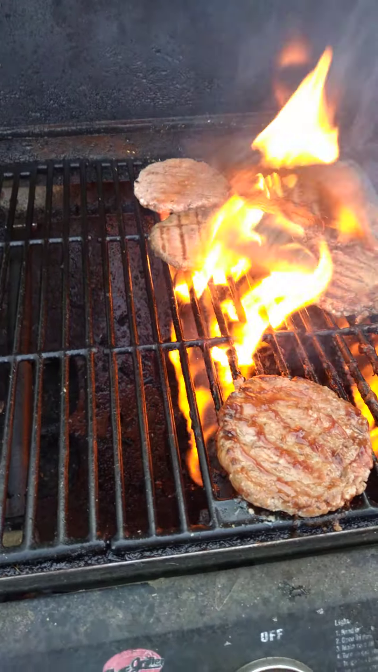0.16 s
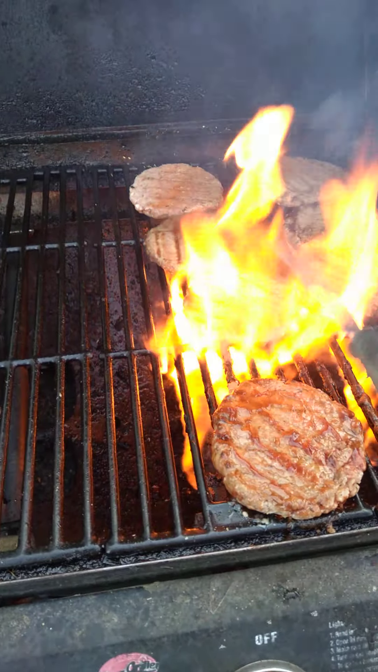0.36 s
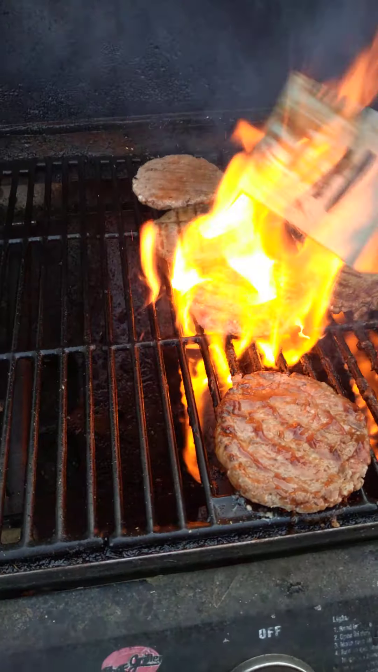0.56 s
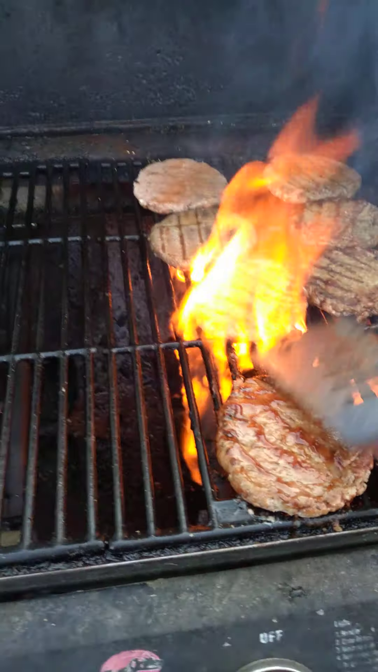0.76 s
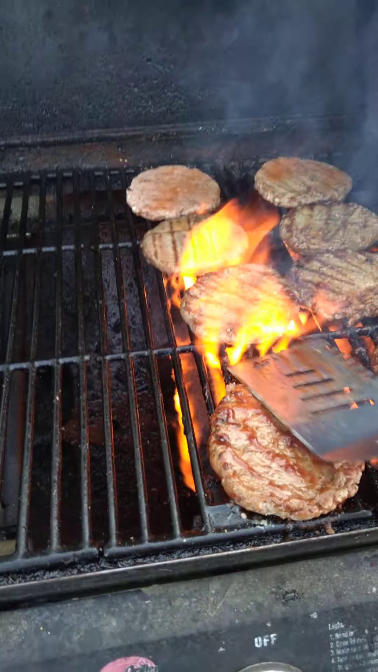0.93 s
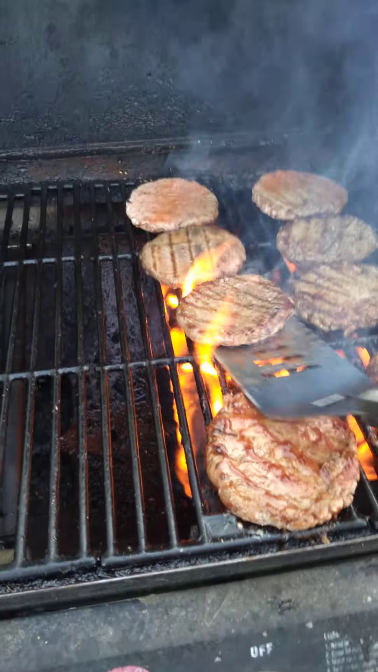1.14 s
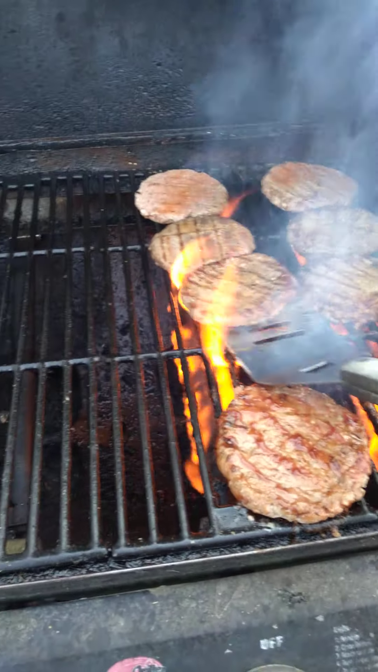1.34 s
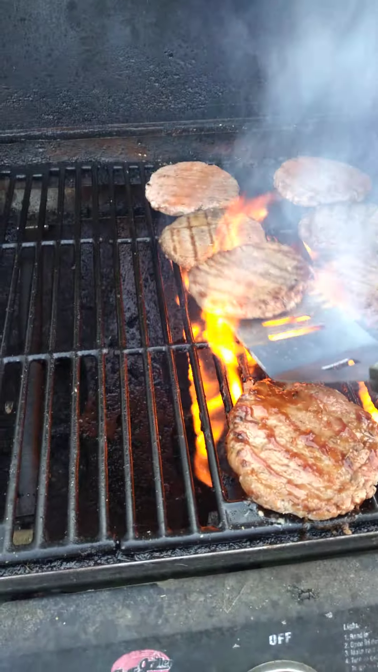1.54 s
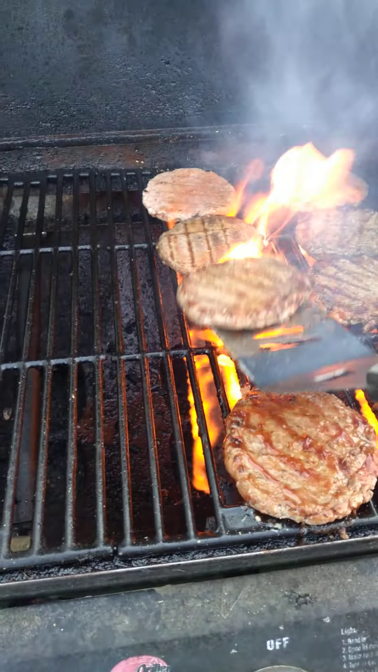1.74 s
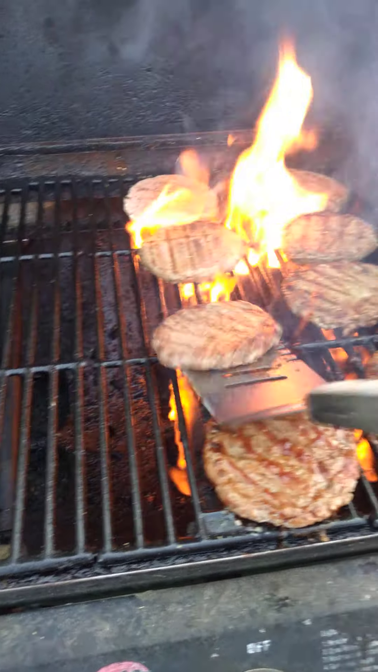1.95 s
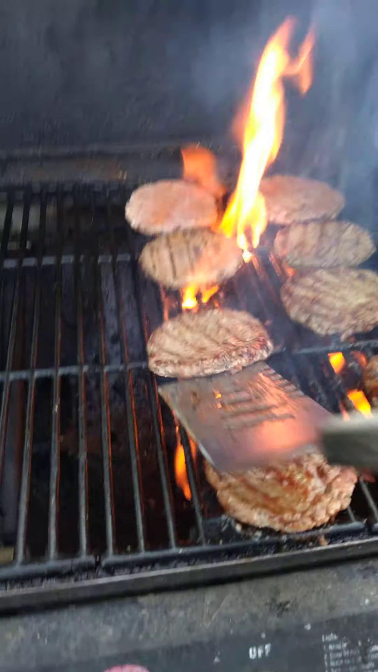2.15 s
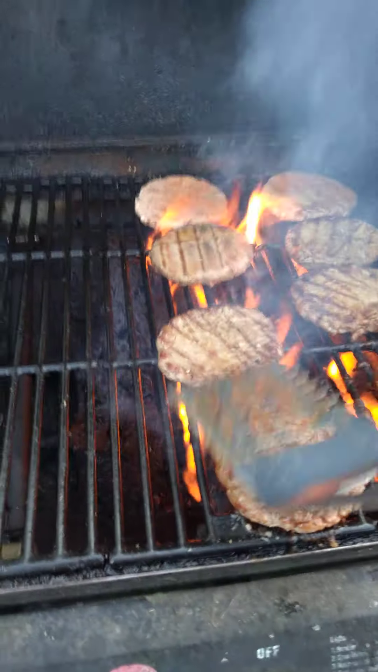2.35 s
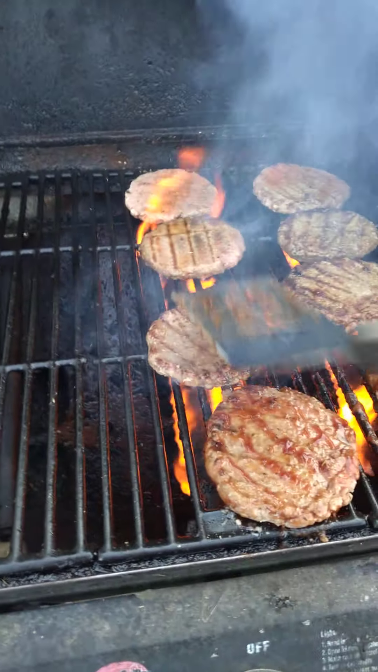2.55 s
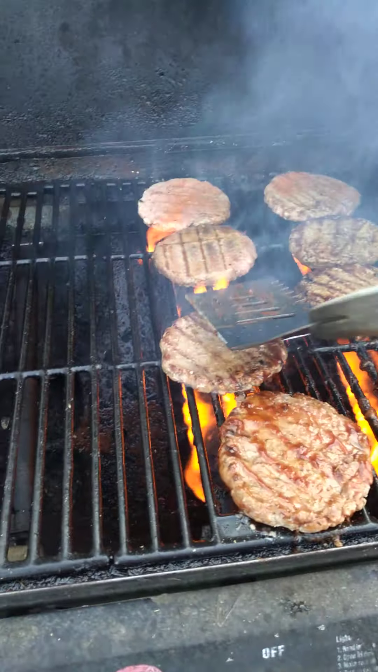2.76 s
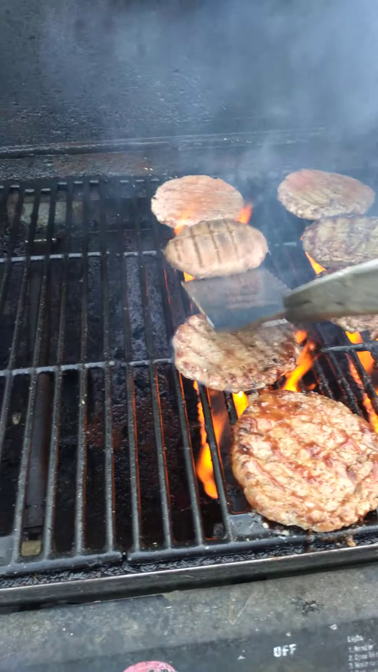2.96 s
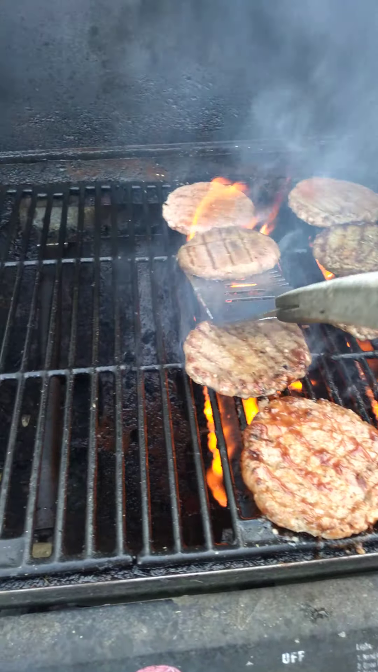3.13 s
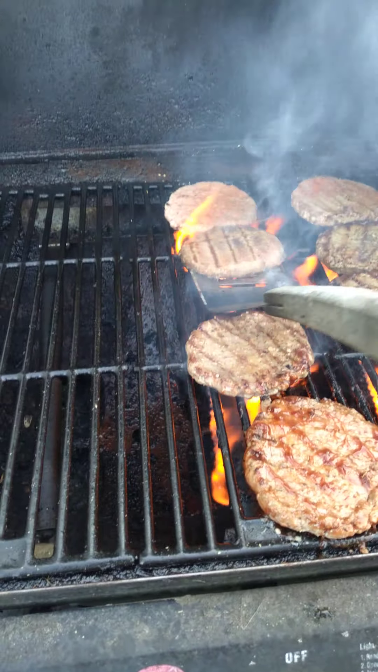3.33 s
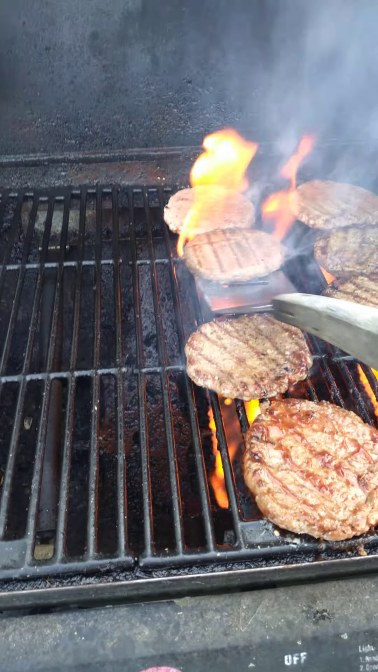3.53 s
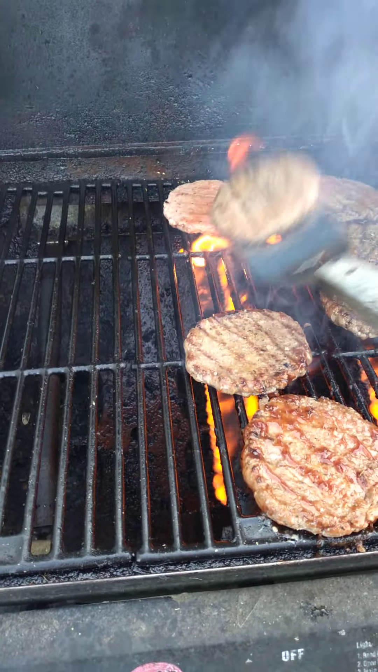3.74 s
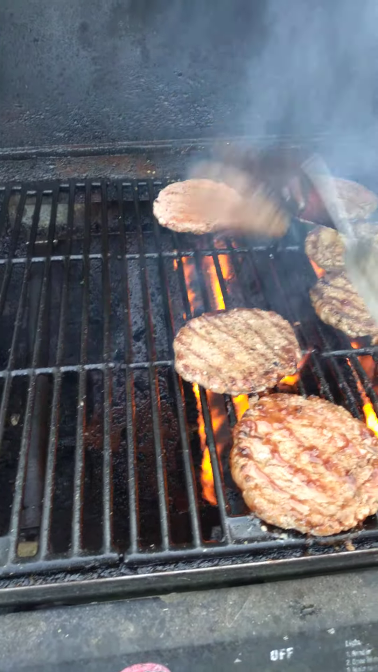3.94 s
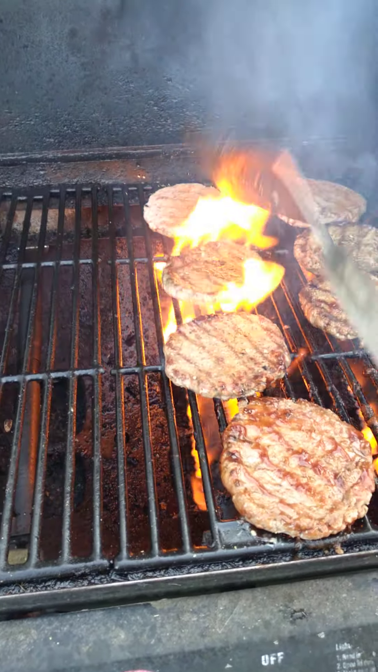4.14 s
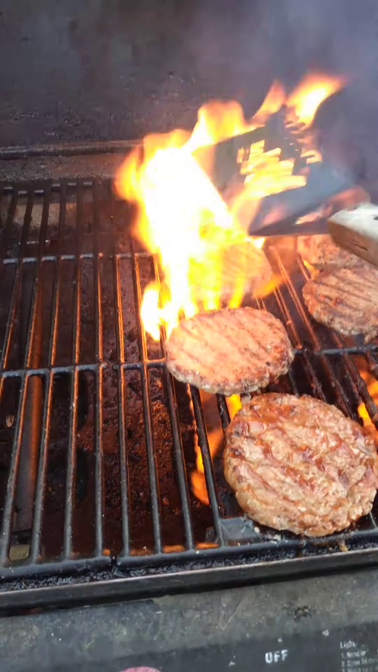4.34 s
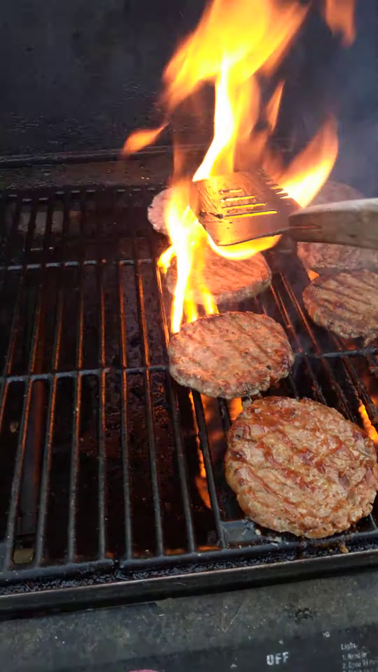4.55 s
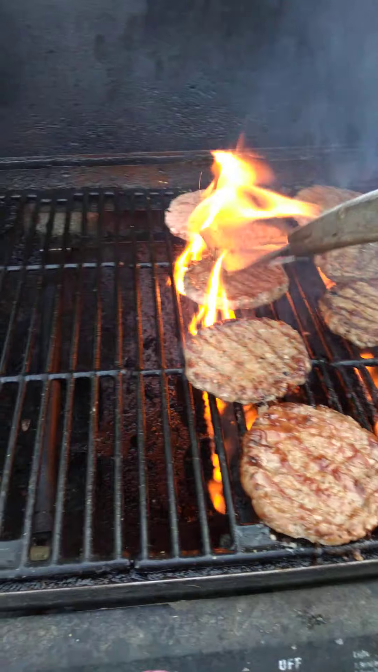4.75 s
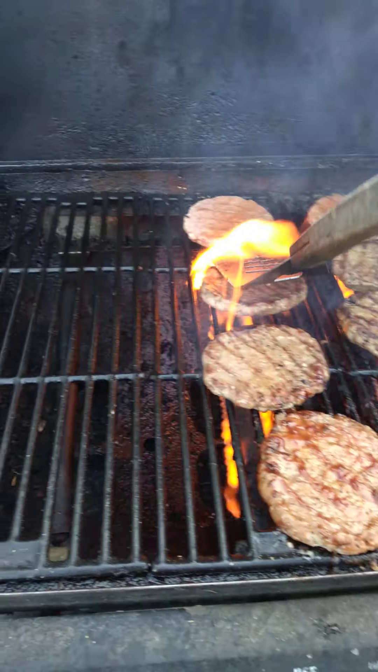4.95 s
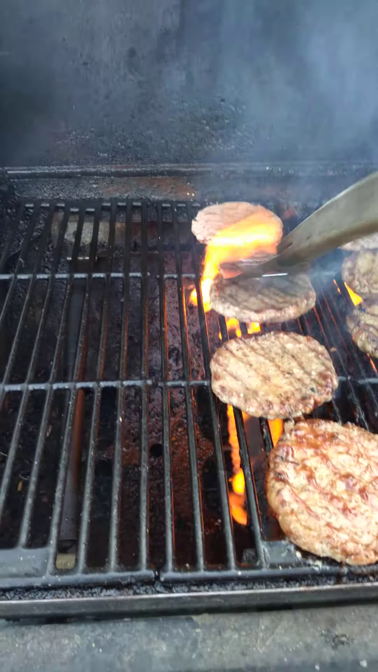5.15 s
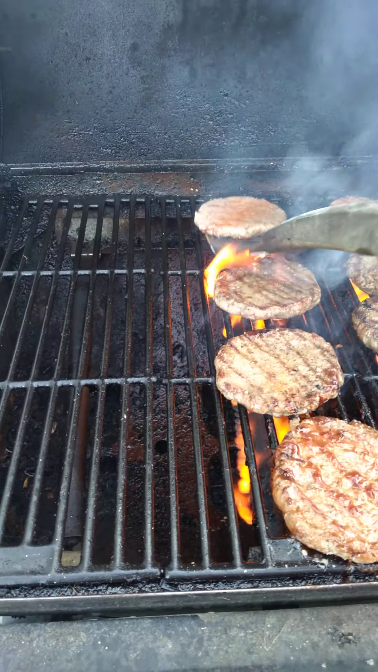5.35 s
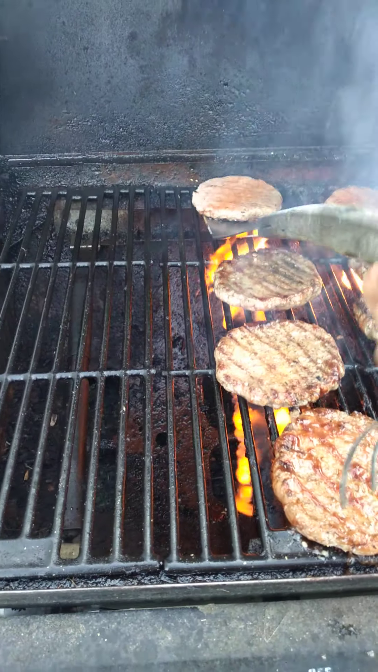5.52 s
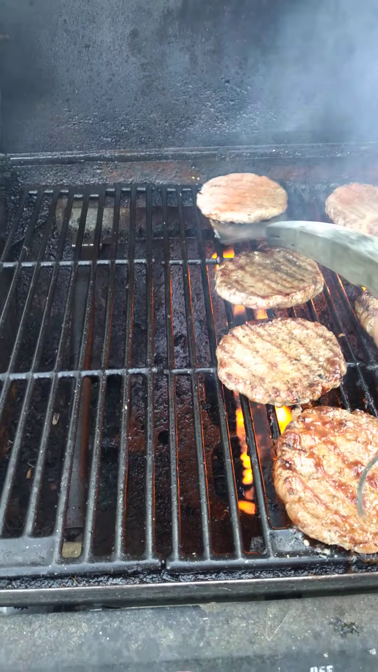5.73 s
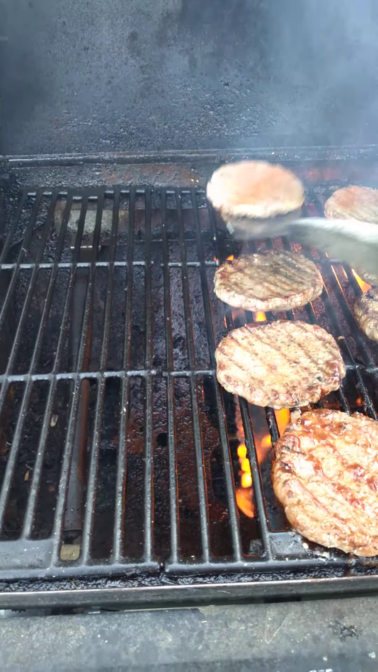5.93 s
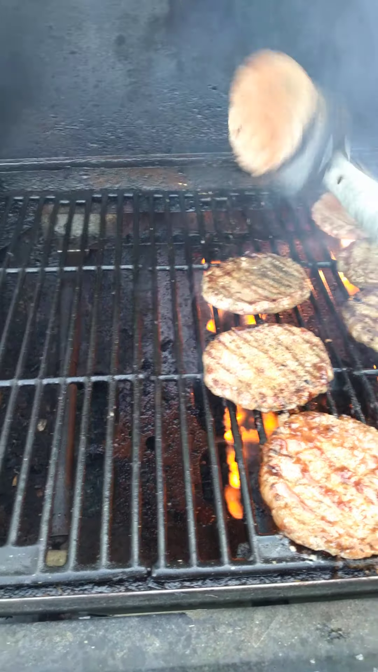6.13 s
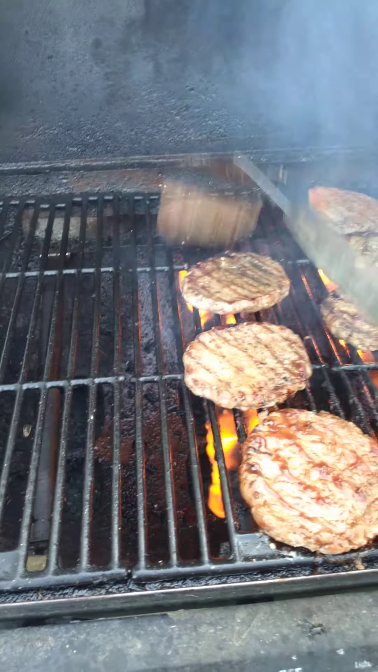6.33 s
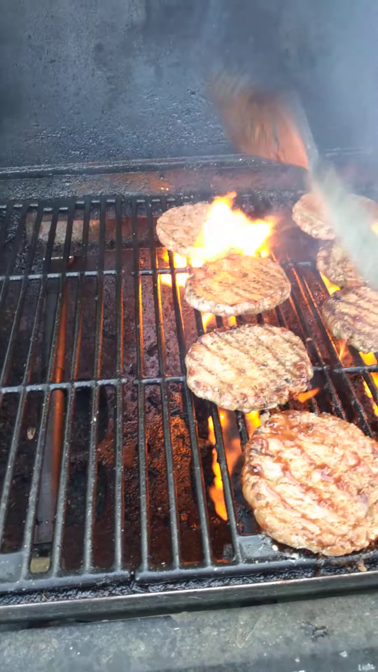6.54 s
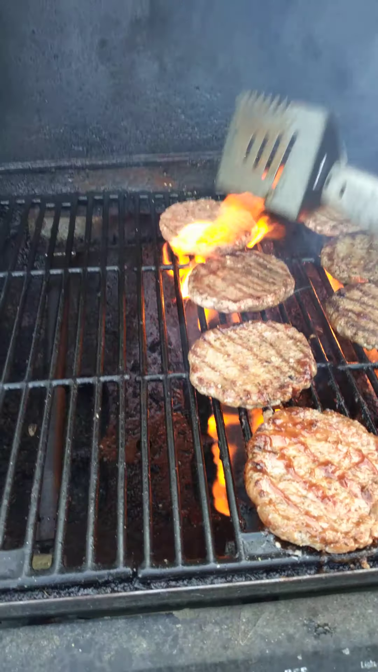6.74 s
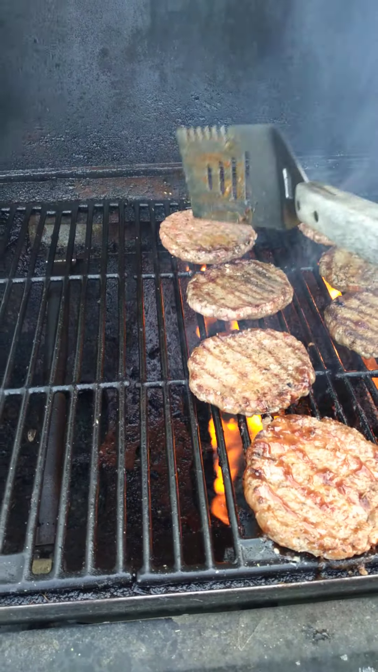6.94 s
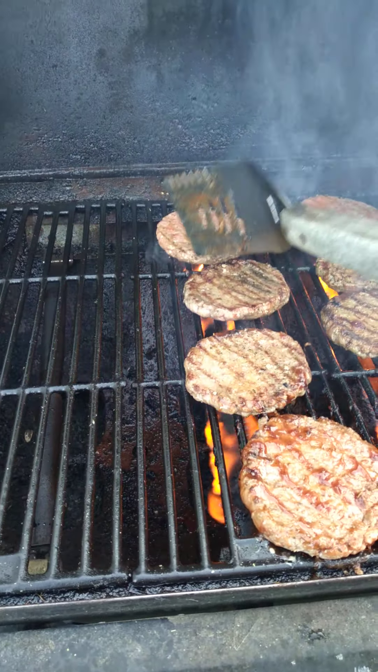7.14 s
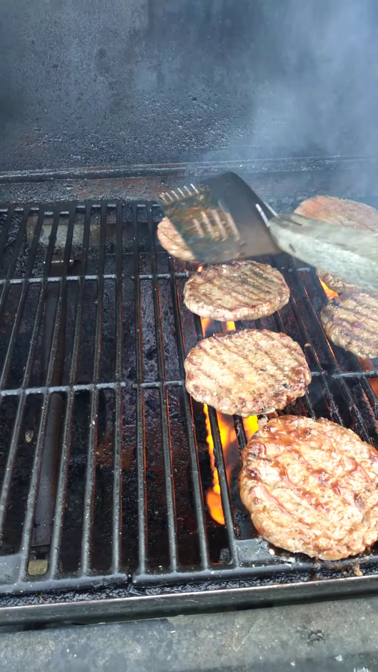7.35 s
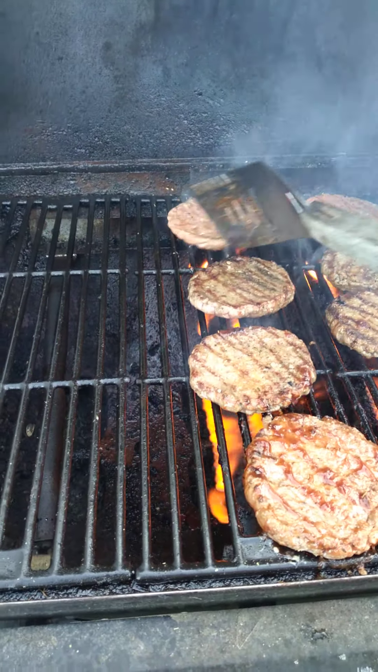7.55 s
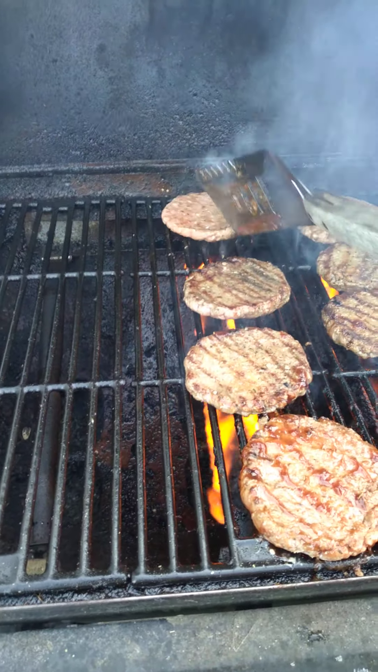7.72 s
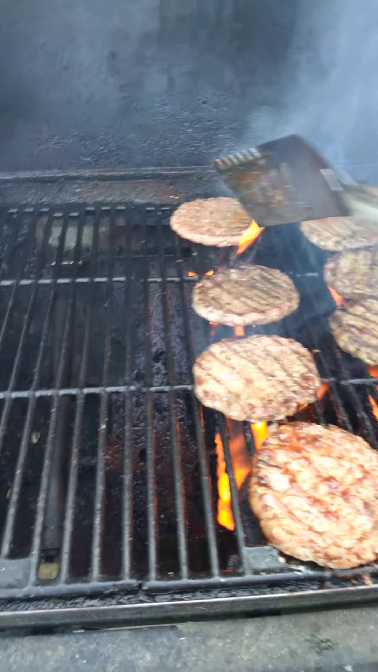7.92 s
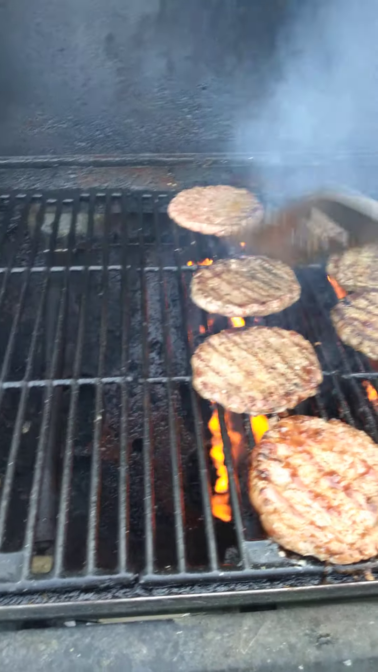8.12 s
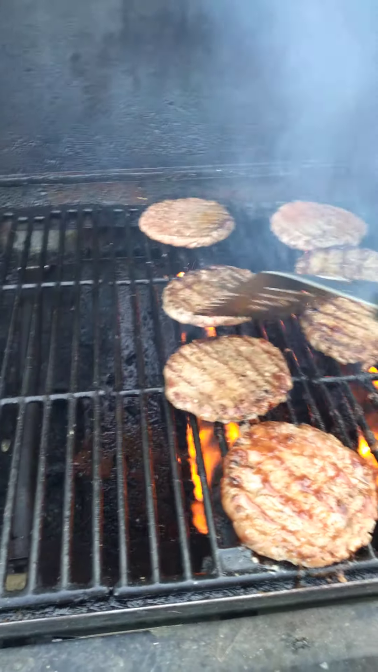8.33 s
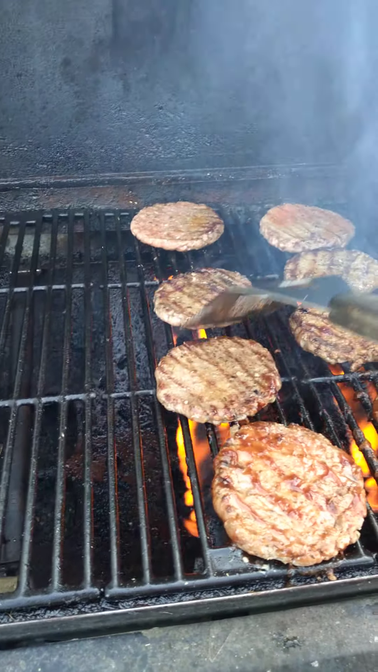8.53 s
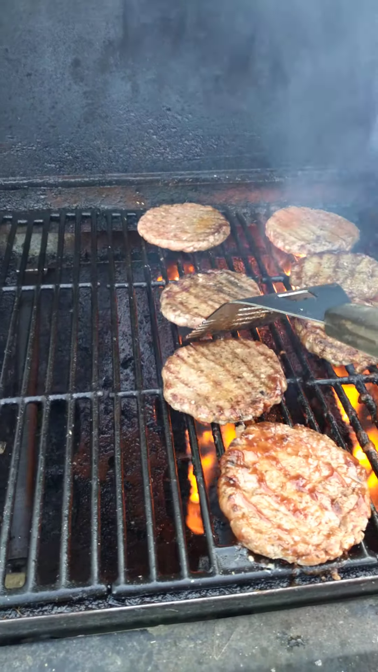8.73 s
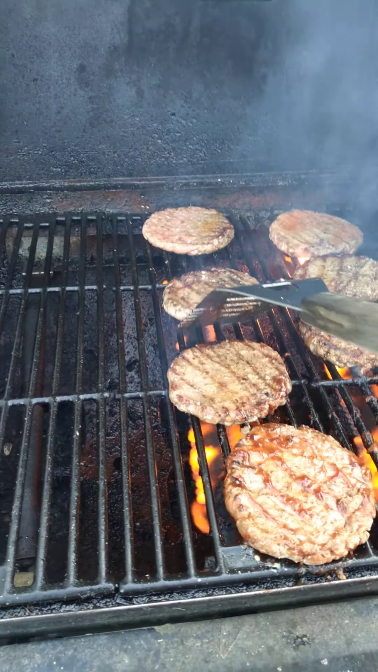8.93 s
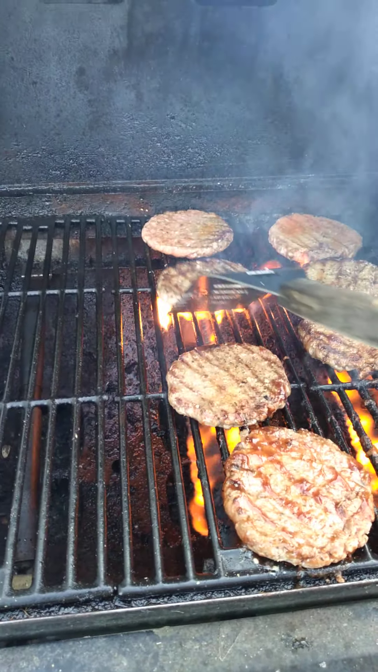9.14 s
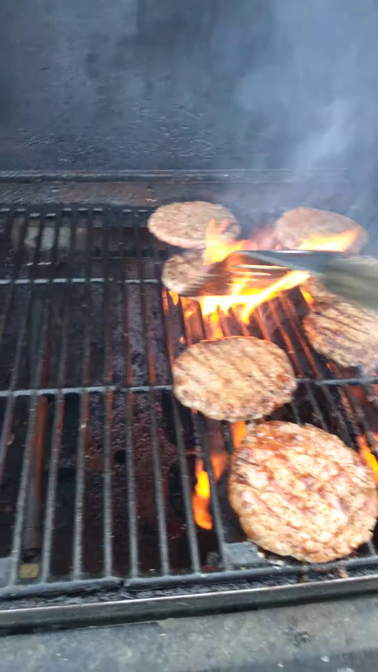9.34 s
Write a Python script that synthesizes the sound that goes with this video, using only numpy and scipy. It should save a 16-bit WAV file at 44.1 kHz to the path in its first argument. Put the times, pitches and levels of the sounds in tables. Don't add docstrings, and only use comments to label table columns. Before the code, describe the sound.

Close fine hiss of frying meat, bursts of spitting fat and rushing flame, light metallic spatula clicks and scrapes, one soft patty thud.

```python
import sys
import numpy as np
from scipy import signal
from scipy.fft import rfft, irfft, next_fast_len
from scipy.io import wavfile
from scipy.ndimage import uniform_filter1d

SR = 44100
rng = np.random.default_rng(int(sys.argv[2]) if len(sys.argv) > 2 else 0)


def amplitude_ratio(level_db):
    exponent = np.asarray(level_db, float) / 20
    return 10 ** exponent


def wav_out(sig):
    wavfile.write(sys.argv[1], SR, np.round(np.clip(np.atleast_2d(sig).T, -1, 1) * 32767).astype(np.int16))


N = 418068
T = np.arange(N) / SR
FAST = next_fast_len(N)


# (time [s], heat level [dB], drip level [dB])
COOKING = [(0.0, -51.5, -58.5), (0.39, -46.5, -55.5), (0.71, -47.5, -58.5), (1.32, -50.5, -67.5),
           (1.74, -48, -55.5), (2.6, -51, -64), (3.3, -51.5, -65), (3.91, -53, -76.5), (4.28, -46, -38),
           (4.6, -51, -54.5), (5.2, -52, -58.5), (5.62, -54, -72), (6.15, -55.5, -75.5), (6.5, -48.5, -64),
           (6.78, -53, -65), (7.4, -53.5, -72), (8.45, -55.5, -72), (9.24, -51.5, -64)]


def cooking():
    heat_db, drip_db = columns(COOKING)
    return heat_db + 52, drip_db + 65


# (frequency [Hz], level per Hz [dB])
HISS = [(190, -13.5), (320, -15.5), (539, -19.5), (723, -13.5), (784, -17), (1340, -20), (3570, -20.5),
        (4340, -17.5), (6730, -12.5), (8730, 2.5), (12000, -6.5), (15700, -9)]


def sizzle():
    heat, _ = cooking()
    hiss = fizz(HISS, 6000, 1.3, wash=2.0, patchy_db=1.5)
    hiss /= band(hiss.mean(0), 9700, 15500).std()
    return hiss * amplitude_ratio(heat - 52) * flicker(0.0082, 0.94)


# (frequency [Hz], level per Hz [dB])
SPIT = [(200, -13), (330, 2.5), (520, -9), (700, -0.5), (1030, -5.5), (1300, -6.5), (2400, -2.5),
        (4150, -7.5), (4800, -14), (5150, -4), (6400, -3), (7200, -1.5), (8700, -5.5), (9600, 2)]
# (frequency [Hz], width [Hz], level [dB])
BARS = [(734, 9.3, -12), (1356, 17, -23), (1713, 12, -9), (1920, 15, -10), (2330, 130, -14.5),
        (2480, 95, -12.5), (3140, 7.9, -38), (5160, 72, -9.5), (5400, 60, -13), (5650, 60, -10),
        (5870, 36, -18), (6550, 60, -10), (7340, 170, -27), (8720, 540, -6)]


def spray():
    drops = fizz(SPIT, 3500, 4.1, wash=1.58, patchy_db=2.05) * flicker(0.009, 1.0)
    hz = np.fft.rfftfreq(FAST, 1 / SR)
    lift = sum(3 * amplitude_ratio(db) / (1 + (2 * (hz - f) / width) ** 2) for f, width, db in BARS)
    return irfft(rfft(drops, FAST) * (1 + lift), FAST)[:, :N]


# (peak time [s], rise [s], fall [s], spit level [dB], duller part level [dB])
FLARES = [(0.05, 0.13, 0.39, -45.5, -55.5), (0.27, 0.067, 0.2, -45, -47.5),
          (0.345, 0.059, 0.063, -32.5, -42.5), (0.39, 0.064, 0.087, -32.5, -43.5),
          (0.5, 0.21, 0.36, -63, -50), (1.03, 0.02, 0.06, -49, -55), (1.62, 0.089, 0.36, -49.5, -59),
          (1.85, 0.095, 0.12, -40.5, -48.5), (2.21, 0.36, 1, -54, -65.5), (3.428, 0.44, 0.53, -54, -65.5),
          (4.04, 0.042, 0.2, -36, -53), (4.1, 0.066, 0.36, -37, -43.5), (4.22, 0.13, 0.32, -32.5, -43.5),
          (4.33, 0.13, 0.16, -30, -39.5), (4.43, 0.1, 0.11, -38, -45), (4.58, 0.11, 0.33, -62, -48),
          (5.12, 0.061, 0.058, -74, -54), (6.38, 0.087, 0.14, -45.5, -49.5),
          (6.43, 0.096, 0.12, -55, -50.5), (6.49, 0.073, 0.11, -56, -46.5),
          (6.54, 0.082, 0.045, -39.5, -49), (6.59, 0.12, 0.06, -60, -52), (6.68, 0.091, 0.2, -50.5, -69),
          (7.25, 0.06, 0.12, -55, -63), (9.11, 0.22, 0.38, -60, -58), (9.21, 0.22, 0.049, -44.5, -59),
          (9.4, 0.1, 0.24, -49.5, -55.5)]


def spitting_fat(drops):
    heat, drip = cooking()
    spit_db, dull_db = np.transpose(FLARES)[3:]
    rest_db = -58.5 + 0.64 * heat
    spit = swells(FLARES, spit_db, rest_db)
    dull = swells(FLARES, dull_db, -68 + 0.34 * drip)
    mix = evened(band(drops, 7900, 9430, soft_hz=123)) * spit * amplitude_ratio(-2)
    mix += evened(band(drops, 9430, 11500, soft_hz=500)) * spit * amplitude_ratio(-19)
    mix += evened(band(drops, 6200, 7900, soft_hz=120)) * np.sqrt(spit * dull) * amplitude_ratio(-1)
    mix += evened(band(drops, 5000, 6200, soft_hz=90)) * dull
    mix += evened(band(drops, 3750, 5000, soft_hz=150)) * spit * amplitude_ratio(-22)
    lean_db = 0.8 * (1 - amplitude_ratio(rest_db) / spit)
    return mix * amplitude_ratio(np.outer([1, -1], lean_db))


# (peak time [s], rise [s], fall [s], level [dB], pitch [Hz])
RUSHES = [(0.12, 0.04, 0.26, -64, 720), (0.24, 0.12, 0.15, -68, 754), (0.36, 0.2, 0.13, -52, 600),
          (1.03, .05, 0.48, -65.5, 676), (1.61, 0.2, 0.56, -68, 430), (1.85, 0.46, 0.14, -59, 553),
          (1.93, 0.13, 0.054, -48, 600), (2.33, 0.075, 0.15, -61.5, 457), (2.5, 0.4, 0.4, -68.5, 633),
          (2.85, 0.09, 0.17, -64.5, 500), (3.41, 0.11, 0.053, -62, 810), (3.59, 0.076, 0.21, -73, 700),
          (4.1, 0.071, 0.58, -53, 710), (4.33, 0.2, 0.092, -65, 790), (4.75, 0.85, 0.19, -62, 900),
          (5.34, 0.14, 0.43, -68.5, 394), (6.34, 0.02, 0.16, -51, 457), (6.42, 0.068, 0.061, -50, 593),
          (6.55, 0.15, 0.13, -48.5, 890), (7.24, 0.069, 0.11, -74, 614), (7.68, 0.25, 1, -74.5, 606),
          (8.66, 0.11, 0.19, -62.5, 503), (9.11, 0.16, 0.24, -61.5, 740), (9.21, 0.17, 0.2, -65, 457),
          (9.4, 0.32, 0.33, -68, 835)]


def rushing_flames(drops):
    _, drip = cooking()
    peak_s, _, _, rush_db, pitch_hz = np.transpose(RUSHES)
    roar = evened(band(drops, 213, 1050))
    pitched = evened(resonate(roar, np.interp(T, peak_s, pitch_hz), 170))
    roar = evened(roar + 1.5 * pitched) * flicker(.02, 1.7)
    return roar * swells(RUSHES, rush_db, -76 + drip)


# (peak time [s], rise [s], fall [s], level [dB], pitch [Hz])
SCRAPES = [(0.0, .1, .3, -66, 1400), (0.26, 0.33, 0.15, -52, 2120), (0.42, .3, 0.055, -60, 1400),
           (0.5, .1, 0.27, -70, 2350), (1.031, 0.05, 0.046, -49, 2450), (1.08, 0.12, 0.35, -63, 1400),
           (1.6, 0.022, 0.58, -53, 1680), (1.79, 0.13, 0.18, -48.5, 1920), (1.93, 0.19, 0.087, -42.5, 1960),
           (2.35, 0.044, 0.055, -48.5, 1920), (3.3, 0.025, 0.27, -54, 2630), (3.38, 0.042, 0.19, -65, 1400),
           (3.6, 0.14, 0.11, -62, 1720), (4.09, 0.05, 0.38, -54.5, 1400), (4.2, 0.17, 0.15, -47, 1910),
           (4.3, 0.07, 0.3, -46.5, 2450), (4.52, 0.1, 0.12, -69, 2450), (4.62, 0.28, 0.26, -52, 1400),
           (4.95, 0.032, 0.15, -61, 2450), (4.96, 0.029, 0.12, -50, 1490), (4.98, 0.66, 0.5, -86, 2310),
           (6.42, 0.16, 0.024, -49, 1880), (6.52, 0.043, 0.16, -46.5, 2160),
           (6.54, 0.06, 0.098, -45.5, 2430), (6.8, 0.05, 0.073, -58, 2800), (6.7, 0.3, 0.017, -47.5, 2020),
           (7.26, 0.029, 0.083, -50.5, 2000), (7.84, 0.035, .35, -61, 1540), (8.61, 0.067, 0.4, -57, 1600),
           (8.835, 0.011, 0.017, -47, 2370), (9.08, 0.1, 0.98, -49.5, 1570),
           (9.15, 0.051, 0.57, -56.5, 1400), (9.17, 0.17, 0.22, -60, 2340), (9.3, 0.06, 0.28, -58, 2370),
           (9.4, 0.11, 0.3, -50, 1920), (0.36, 0.19, 0.095, -65, 3250), (1.825, 0.052, 0.056, -49, 3330),
           (4.1, 0.068, 0.27, -46.5, 3180), (4.23, 0.26, .3, -45, 3070), (5.099, .006, 0.023, -48, 3420)]
# (frequency [Hz], width [Hz])
HOLLOWS = [(1400, 260), (1760, 330), (2450, 340), (3250, 700)]


def steam_and_scrapes(drops):
    _, drip = cooking()
    dull_db = np.transpose(FLARES)[4]
    drag_db, drag_hz = np.transpose(SCRAPES)[3:]
    steam = band(drops, 1050, 5000)
    steam_db = np.r_[dull_db, drag_db] - 4
    mix = evened(steam) * swells(FLARES + SCRAPES, steam_db, -63 + 0.88 * drip)
    for hz, width in HOLLOWS:
        mismatch_db = 76 * abs(np.log2(drag_hz / hz))
        woken = swells(SCRAPES, drag_db - mismatch_db, -87 + 0.9 * drip)
        sputter = flicker(.012, 2.2)
        drift_hz = hz * (1 + .03 * evened(uniform_filter1d(np.log(sputter), size=3000)))
        ring = fixed_resonance(resonate(steam, drift_hz, width), hz, 1.8 * width)
        mix += evened(ring) * woken * sputter
    return mix


def flare():
    drops = spray()
    return spitting_fat(drops) + rushing_flames(drops) + steam_and_scrapes(drops)


# (time [s], peak level [dB], ring [Hz], left-right [dB])
TAPS = [(0.0644, -51, 1950, 11), (0.991, -66, 2400, -14), (1.0255, -56, 2500, 0), (1.6157, -47.5, 1740, 12),
        (1.713, -54, 1710, -7), (1.9089, -40.5, 2270, 13), (2.0544, -51, 2300, 13), (2.3311, -52, 2300, 17),
        (2.3532, -44, 2130, 1), (2.5373, -49, 2450, 12.5), (2.7991, -41.5, 2280, 10),
        (3.2903, -51, 2700, 19), (3.402, -46.5, 2620, 4), (3.6072, -52.5, 3250, -14),
        (3.7683, -51.5, 2700, 5), (4.5053, -38.5, 2420, 6), (4.569, -39.5, 2550, 1), (4.778, -39, 1520, 3),
        (5.0964, -46.5, 1540, -5), (5.259, -52, 1680, 0), (6.3979, -51, 1920, -2), (6.5094, -36, 2100, 5),
        (6.8433, -59, 2750, 11), (7.2565, -45, 1520, 3), (7.3602, -50.5, 2330, -1),
        (7.5953, -54.5, 1560, 6), (7.805, -53.5, 1610, 9), (8.528, -58, 3480, 9), (8.8238, -48, 2480, -7),
        (8.8245, -48, 3200, 4), (9.0808, -59, 1740, 6)]
# (time [s], peak level [dB], ring [Hz], left-right [dB])
KNOCKS = [(0.098, -52, 700, 4), (1.004, -50, 700, 3), (1.024, -48, 700, -3), (3.367, -55.5, 795, 6),
          (3.6, -63, 734, 15), (1.914, -56, 680, -6), (4.778, -53, 850, 5), (7.259, -59.5, 640, -5),
          (8.615, -56.5, 366, 11), (8.827, -54.5, 505, 8)]
# (time [s], peak level [dB], ring [Hz], left-right [dB])
TOUCHES = [(0.0169, -43, 1290, 4.5), (0.1043, -38, 1310, 4), (0.4673, -39, 2450, -4),
           (0.5147, -42, 2250, 0.0), (0.5487, -47, 1900, 2.0), (1.007, -36, 2290, 6),
           (1.5968, -43, 1650, 3.0), (1.7689, -48, 1680, 4.5), (2.091, -38, 2460, 13),
           (2.2762, -45, 2280, -2), (2.6294, -46, 2210, 3), (2.7207, -46, 2450, 5), (2.8903, -38, 2320, 6),
           (3.3667, -47, 2330, 2.0), (3.4545, -37, 2710, 6), (3.966, -46, 1660, 0.0),
           (4.074, -36, 1410, -11), (4.234, -29, 2480, -11), (4.313, -21, 2260, -1),
           (4.7082, -42, 2440, 1.5), (4.9482, -40, 2350, 1), (5.1741, -38, 2440, 1), (6.4762, -34, 1910, 5),
           (6.5294, -38, 2330, 7), (7.232, -47, 1700, 4), (8.8494, -46, 2450, 6.5), (9.06, -47, 1400, 1),
           (9.1227, -49, 1380, 3), (9.2758, -36, 2280, 7), (9.3013, -39, 2400, 13), (9.3402, -41, 2330, 10),
           (1.709, -36, 1750, -3), (1.722, -30, 1740, 2), (1.872, -32, 1770, 2), (4.825, -37, 1100, 4),
           (7.263, -46, 2200, -5), (7.264, -41, 1180, 8)]


def spatula():
    out = np.zeros((2, N + 8000))
    # (blows, t60 [s], level [dB], share of dull noise, share of ring, ring half-width as share of pitch)
    kinds = [(TAPS, 0.1, -5.5, .7, 1.15, .15),
             (KNOCKS, 0.22, -5.5, 0.3, 3.2, .07),
             (TOUCHES, 0.077, -12.5, .4, 1.6, .08)]
    for rows, t60, trim_db, dull, clear, span in kinds:
        for s, db, hz, pan_db in rows:
            noise = np.sqrt(SR / hz) * burst(t60, pan_db)
            ring = dull * band(noise, .5 * hz, 2 * hz, soft_hz=30)
            ring += clear * band(noise, (1 - span) * hz, (1 + span) * hz, soft_hz=30.2)
            out[:, round(s * SR):][:, :8000] += amplitude_ratio(db + trim_db) * ring
    return out[:, :N]


# (time [s], peak level [dB], left-right [dB])
CRACKS = [(2.0536, -28, 0), (2.799, -29.5, -7), (3.291, -29.5, 8), (4.5053, -27, 8), (4.57, -23, -2),
          (5.0992, -22, -1), (6.3976, -30, -15), (7.359, -40, 3), (8.8238, -38, -2)]


def cracks():
    out = np.zeros((2, N + 8000))
    for s, db, pan_db in CRACKS:
        crack = band(burst(0.07, pan_db), 4000, 9600, soft_hz=905)
        out[:, round(s * SR):][:, :8000] += amplitude_ratio(db - 9.5) * crack
    return out[:, :N]


# (time [s], peak level [dB], left-right [dB])
TICKS = [(0.6619, -25, 0), (1.0266, -25, -15), (2.0537, -30, -3.5), (3.2844, -27, -2.5),
         (3.3677, -31, -3.0), (3.7688, -34, -1.5), (3.8716, -28.5, -5), (4.0865, -13.5, 4),
         (5.0125, -27, 4), (5.0973, -31, -1.5), (5.4181, -36, -2.0), (7.3604, -26.5, -6),
         (7.6036, -37, -2.5), (8.1838, -37, -1.5), (8.6916, -35, -3.0), (9.3906, -35, -4)]
# (time [s], peak level [dB], pitch [Hz], left-right [dB])
SNAPS = [(0.6633, -25, 8800, -14), (1.9106, -31, 2100, 1), (2.3543, -31, 2250, -2), (2.7998, -33, 2250, 7),
         (4.0878, -21, 8800, 2), (4.3125, -27, 2240, 1), (5.0985, -28, 3400, -2), (7.2565, -39, 1500, 0),
         (8.8255, -35, 2800, 0), (1.0277, -24, 8900, -5), (5.0982, -34, 1600, -2)]


def ticks():
    out, t = np.zeros((2, N + 400)), np.arange(-100, 300) / SR
    spits = []
    for s, db, pan_db in TICKS[1:]:
        spits.append((s + .0008, db + 1, 8500 * rng.uniform(.75, 1.1), pan_db))
    for s, db, hz, pan_db in spits + SNAPS:
        fade = np.exp(-np.where(t < 0, -2, 1) * t * hz / 1.3)
        tick = np.cos(2 * np.pi * hz * t) * fade
        both = np.array([np.roll(tick, 6), tick])
        out[:, round(s * SR) - 100:][:, :400] += amplitude_ratio(db) * both * panned(pan_db)
    return band(out[:, :N], 900, SR, soft_hz=200)


# (time [s], peak level [dB], t60 [s], left-right [dB])
POPS = [(1.0266, -18, .01, -5.5), (2.798, -30, .025, -1.5), (3.2844, -36, .03, -1.5),
        (5.0973, -24, .025, -1.5), (6.3374, -29, .025, -4.5), (8.8228, -31, .025, -1)]


def pops():
    out, t = np.zeros((2, N + 2000)), np.arange(2000) / SR
    u = t / 5.5e-5
    push = 1.1 * (1 - u) * np.exp(-u)
    pushes = np.array([np.roll(push, 46), np.roll(push, 38)])
    for s, db, t60, pan_db in POPS:
        droplets = .33 * rng.standard_normal((2, 2000)) * amplitude_ratio(-60 * t / t60)
        sound = pushes + np.roll(droplets, 38, axis=1)
        out[:, round(s * SR):][:, :2000] += amplitude_ratio(db) * sound * panned(pan_db)
    return band(out[:, :N], 400, 13000, soft_hz=400)


# (time [s], peak level [dB], hardness [dB per octave], rise [s])
THUDS = [
    (6.319, -28, 4, .005),
    (6.334, -19.5, 3, 0.0022),
    (6.351, -24.5, -5, .005),
    (6.367, -20, -8, .004),
    (6.434, -26.5, -13.5, .012),
    (6.455, -30, -12, .008),
    (6.485, -30, -4, 0.0046),
]
FIREBOX_HZ = 164.5, 209.6, 242.6, 322.7, 368, 428, 573, 690
# (level [dB], t60 [s])
FIREBOX = [(0.5, 0.11), (0, 0.065), (-2, 0.089), (-4, 0.11), (-1, 0.076), (-3.5, 0.07), (0.5, 0.037),
           (-4, 0.028)]


def thuds():
    out, t = np.zeros(N), np.arange(12000) / SR
    for s, db, hard_db, rise in THUDS:
        ring = np.zeros(12000)
        for hz, (mode_db, t60) in zip(FIREBOX_HZ, FIREBOX):
            fade = amplitude_ratio(mode_db + hard_db * np.log2(hz / 300) - 60 * t / t60)
            ring += fade * np.sin(2 * np.pi * hz * t)
        out[round(s * SR):][:12000] += amplitude_ratio(db - 9) * ring * (1 - np.exp(-t / max(rise, 2e-4)))
    return band(out, 145, 800, soft_hz=20)


# (frequency [Hz], level per Hz [dB])
FLUTTER = [(15, -49), (36, -30), (52, -8.5), (107, -15), (205, -3), (288, -13.5), (352, -8), (500, -22.5),
           (650, -68), (1100, -120)]


def burners():
    _, drip = cooking()
    rush_db, pitch_hz = np.transpose(RUSHES)[3:]
    flutter = evened(fizz(FLUTTER, 300, 1.5, wash=0.52, patchy_db=2.5, size=2048))
    gust_db = rush_db - 4.5 - 8 * np.log2(pitch_hz / 600)
    return flutter * swells(RUSHES, gust_db, -68 + 0.17 * drip)


# (time [s], firings per second [Hz])
ENGINE = [(0, 24.82), (.59, 25.23), (1.19, 25.2), (1.78, 24.24), (2.37, 24.42), (2.96, 24.63),
          (3.56, 24.42), (4.15, 23.57), (4.74, 23.7), (5.33, 23.3), (5.93, 22.57), (6.52, 22.71),
          (7.11, 23.44), (7.7, 24.18), (8.3, 24.75), (8.89, 24.97), (9.48, 25.1)]
# (time [s], level [dB])
EXHAUST = [
    (0, 0),
    (.0097, -4),
    (.0196, -10),
    (.029, -18),
]
# (time [s], level [dB], boom level [dB])
ENGINE_DB = [(0, -64, -76), (3, -64.5, -73), (5.5, -65, -72.5), (7.5, -64, -73.5), (9.22, -66.5, -78),
             (9.27, -63, -64.5), (9.48, -63, -64)]


def engine():
    turns = np.cumsum(columns(ENGINE)[0]) / SR
    fired = np.diff(np.floor(turns + .65), prepend=0) > 0
    blows = fired * amplitude_ratio(.7 * rng.standard_normal(N))
    blows = sum(amplitude_ratio(db) * np.roll(blows, int(s * SR)) for s, db in EXHAUST)
    u = np.arange(-400, 401) / SR / 0.0017
    puff = (1 - u ** 2 + u) * np.exp(-u ** 2 / 2)
    puffs = band(signal.oaconvolve(blows, puff, "same"), 136, 900, soft_hz=24.8)
    db, boom_db = columns(ENGINE_DB)
    tailpipe = amplitude_ratio(-15) * evened(band(puffs, 237, 260, soft_hz=4))
    puffs = evened(puffs) + tailpipe
    boom = evened(band(puffs, 72.0, 135, soft_hz=3.8))
    return amplitude_ratio(db) * puffs + amplitude_ratio(boom_db) * boom


# (frequency [Hz], likeness [0-1])
SAME = [(100, .97), (430, .88), (550, .68), (850, .5), (1050, .7), (1220, .3), (1450, .68), (1800, .48),
        (2400, .72), (3000, .28), (4000, .2), (15000, .08)]
# (frequency [Hz], lead [radians])
LEAD = [(100, 0), (780, 0), (1030, -3), (1150, -3), (1290, -.7), (1550, -1.6), (2250, -1), (2840, -3),
        (3900, -9.5), (6000, -15.5), (9000, -24), (15000, -41)]
# (frequency [Hz], left-right [dB])
TILT = [(60, 3), (92, -5), (140, 5.5), (210, 0.5), (330, -0.5), (500, 1.5), (770, 4), (1170, 3), (1790, 1),
        (2740, 3.5), (4190, -1.5), (6410, 1.5), (9810, -5), (15000, -0.5)]


def ports(near, apart):
    hz, left = np.fft.rfftfreq(FAST, 1 / SR), rfft(near, FAST)
    same, tilt = np.clip(read(SAME, hz), 0, 1), amplitude_ratio(read(TILT, hz) / 2)
    shared = same * left * np.exp(-1j * read(LEAD, hz))
    right = shared + np.sqrt(1 - same ** 2) * rfft(apart, FAST)
    return irfft(np.array([left * tilt, right / tilt]), FAST)[:, :N]


def panned(pan_db):
    return amplitude_ratio([[pan_db / 2], [-pan_db / 2]])


def fizz(spectrum, per_s, spread_db, wash, patchy_db, size=512):
    hit = rng.random((2, N)) < per_s / SR
    sizes = amplitude_ratio(spread_db * np.minimum(rng.exponential(1, (2, N)), 3.2))
    bursts = hit * sizes * rng.standard_normal((2, N))
    raw = ports(*(evened(bursts) / np.sqrt(2) + wash * rng.standard_normal((2, N))))
    hz, _, z = signal.stft(raw, SR, nperseg=size, noverlap=size * 3 // 4)
    patches = rng.standard_normal(z.shape[::-1]).T
    patches = uniform_filter1d(uniform_filter1d(patches, size=6, axis=1), size=14, axis=2)
    z *= amplitude_ratio(read(spectrum, hz)[:, None] + patchy_db * patches / patches.std())
    return signal.istft(z, SR, nperseg=size, noverlap=size * 3 // 4)[1][:, :N]


def burst(t60, pan_db):
    noise = rng.standard_normal((2, 8000)) * amplitude_ratio(-60 * np.arange(8000) / SR / max(t60, .002))
    noise[1] = .5 * np.roll(noise[0], -8) + 1.09 * noise[1]
    return noise * panned(pan_db)


def swells(rows, db, rest_db):
    s, rise, fall = np.transpose(rows)[:3, :, None]
    t = T[::64]
    before, after = (s - t) / np.maximum(rise, .005), (t - s) / np.maximum(fall, .005)
    away_db = 20 * np.where(t < s, before, after)
    down_db = np.hypot(away_db, 3.0) - 3.0
    power = (amplitude_ratio(np.asarray(db)[:, None] - down_db) ** 2).sum(0)
    return np.interp(T, t, np.sqrt(power + amplitude_ratio(rest_db[::64]) ** 2))


def flicker(seconds, db):
    size = max(int(seconds * SR), 2)
    smooth = uniform_filter1d(uniform_filter1d(rng.standard_normal(N), size), size)
    return amplitude_ratio(db * evened(smooth))


def resonate(x, hz, width):
    turn = np.exp(2j * np.pi * np.cumsum(hz * np.ones(N)) / SR)
    r = np.exp(-np.pi * width / SR)
    return 2 * (turn * signal.lfilter([1 - r], [1, -r], x / turn)).real


def fixed_resonance(x, hz, width):
    r = np.exp(-np.pi * width / SR)
    return 2 * signal.lfilter([1 - r], [1, -r * np.exp(2j * np.pi * hz / SR)], x).real


def band(x, lo_hz, hi_hz, soft_hz=60):
    size = next_fast_len(x.shape[-1])
    hz = np.fft.rfftfreq(size, 1 / SR)
    edges = .25 * (1 + np.tanh((hz - lo_hz) / soft_hz)) * (1 + np.tanh((hi_hz - hz) / soft_hz))
    return irfft(rfft(x, size) * np.sqrt(edges), size)[..., :x.shape[-1]]


def evened(x):
    return x / np.sqrt(np.mean(np.atleast_2d(x).mean(0) ** 2) + 1e-20)


def read(points, hz):
    f, value = np.transpose(points)
    return np.interp(np.log(hz + 1), np.log(f + 1), value)


def columns(rows):
    s, *rest = np.transpose(rows)
    return [np.interp(T, s, c) for c in rest]


def scene():
    cooking_sounds = sizzle() + flare() + cracks() + ticks() + pops()
    low = (thuds() + engine()) * amplitude_ratio([[-.3], [.3]])
    return cooking_sounds + spatula() + burners() + low


def roll_off(x):
    return signal.sosfilt(signal.butter(12, 17060, fs=SR, output="sos"), x)


def record(dry):
    heard = band(dry, 46, SR, soft_hz=23)
    heard = band(heard, -999, 15820, soft_hz=12)
    return roll_off(heard)


dry = scene()
out = record(dry)
wav_out(out)
```